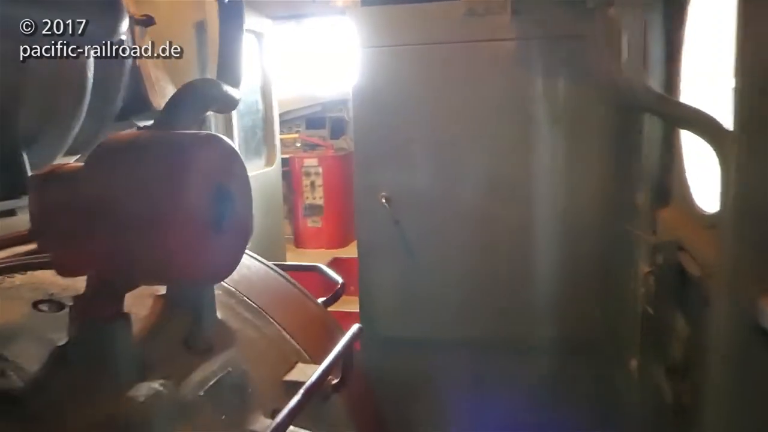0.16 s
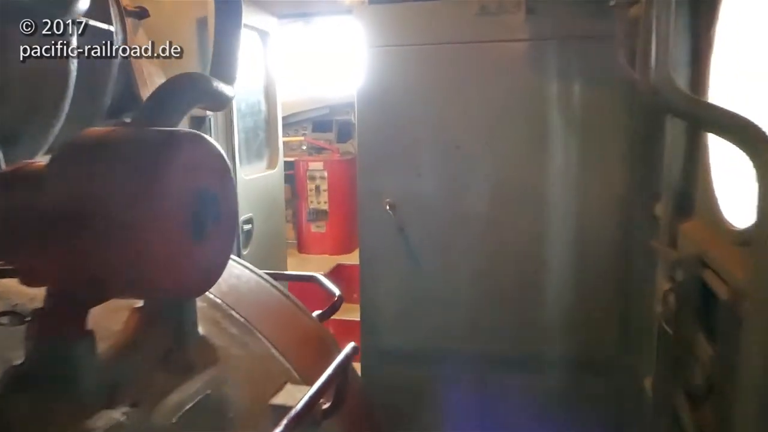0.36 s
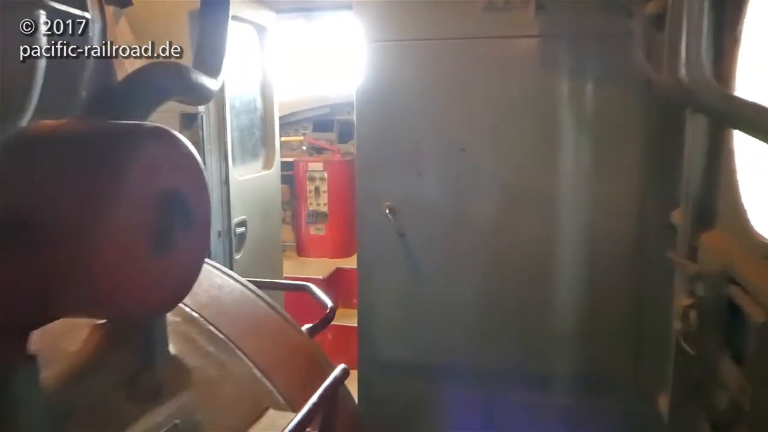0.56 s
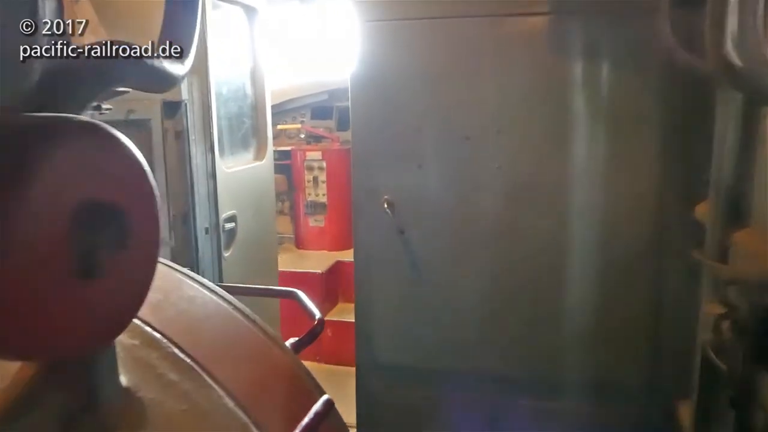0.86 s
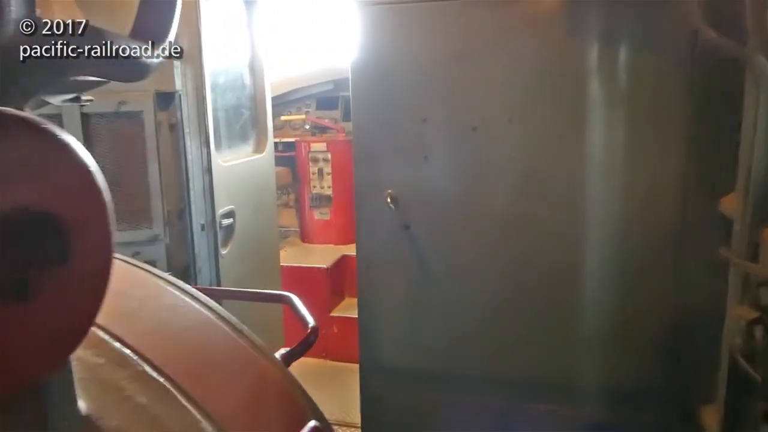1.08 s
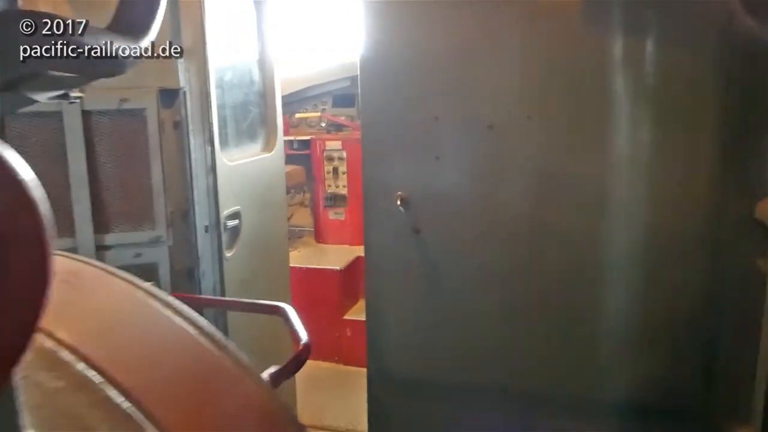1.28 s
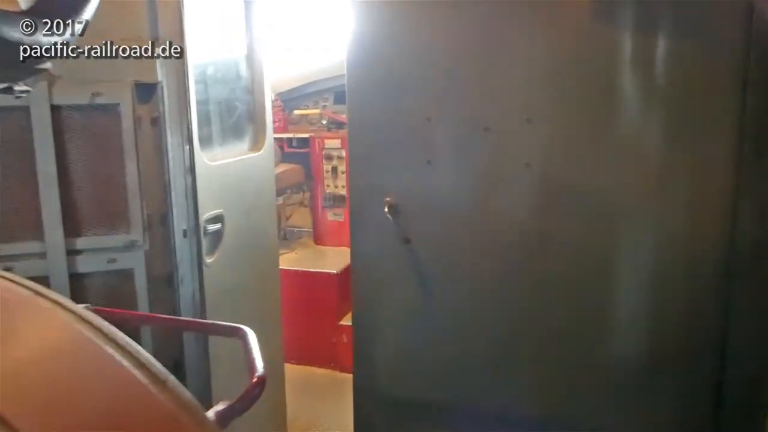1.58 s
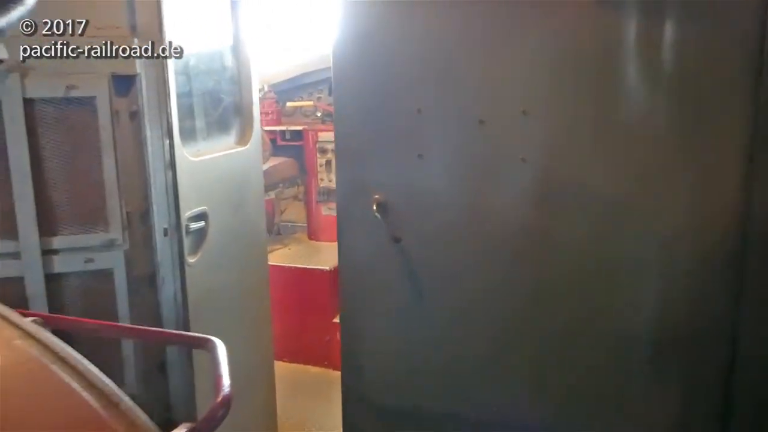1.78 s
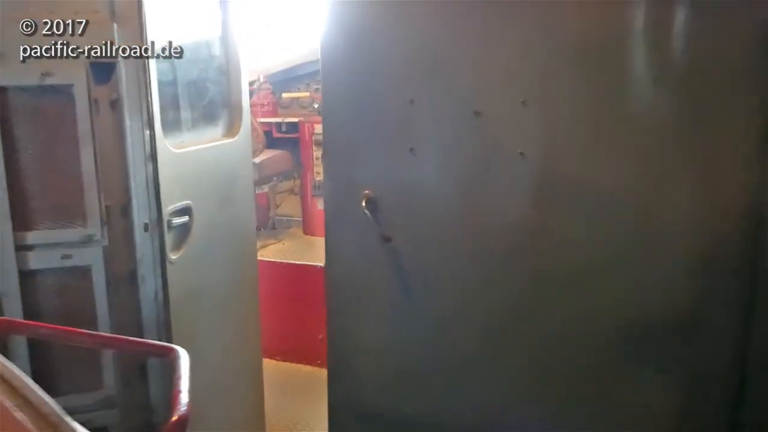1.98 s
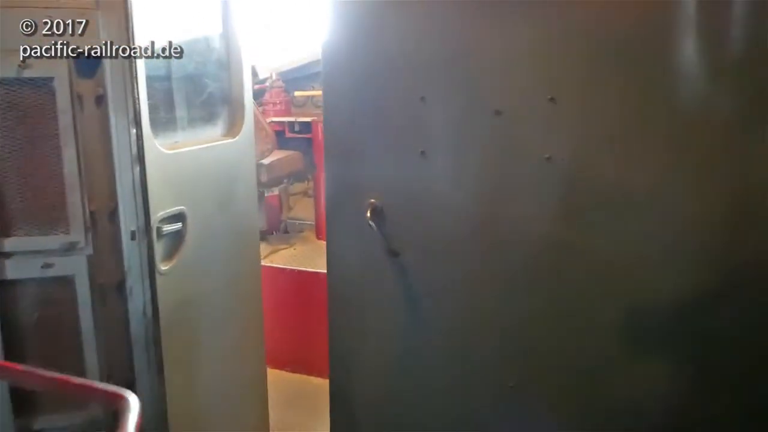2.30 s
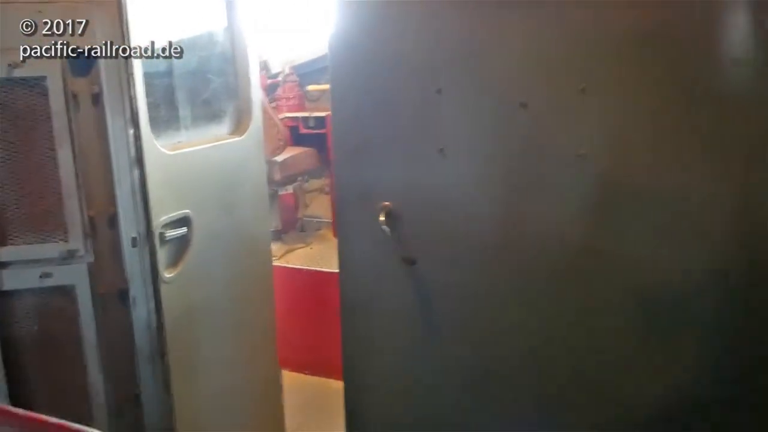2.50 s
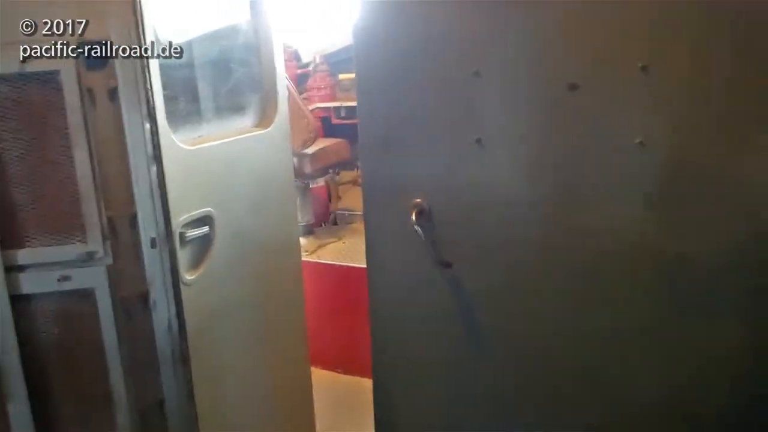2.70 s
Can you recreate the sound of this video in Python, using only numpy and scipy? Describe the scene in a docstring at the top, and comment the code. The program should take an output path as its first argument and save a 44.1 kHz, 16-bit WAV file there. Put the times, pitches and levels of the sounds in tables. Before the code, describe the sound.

A large diesel engine idles continuously in a cramped steel engine room, its low drone swelling and fading as a handheld microphone moves; dense mechanical clatter, deep rumble and faint airy hiss surround it.

```python
"""A big diesel idles near 800 rpm, slowing slightly, in the steel engine room of a locomotive.
Multiples of the crank rate are summed as sines; they swell and fade as the microphone is carried
through the room's standing waves. Shaped stereo noise makes a low rumble, two soft deep thuds
(perhaps footsteps of whoever carries the microphone), a dense clatter throbbing faintly with the
crank, a humming steel panel, and an airy hiss with three high resonances."""
import sys
import numpy as np
from scipy import signal
from scipy.fft import rfft, irfft, next_fast_len
from scipy.io import wavfile

SR = 44100
rng = np.random.default_rng(int(sys.argv[2]) if len(sys.argv) > 2 else 0)


def master_out(mix):
    """Clip the mix to full scale and print it as 16-bit PCM to the path in sys.argv[1]."""
    frames = np.transpose(np.atleast_2d(mix))
    ceiling = np.clip(frames, -1, 1)
    pcm = np.round(ceiling * 32767).astype(np.int16)
    wavfile.write(sys.argv[1], SR, pcm)


N = 125685


def from_db(db):
    """Decibels to amplitude gain."""
    return 10 ** (np.asarray(db) / 20)


def rms_one(x):
    """Scale to unit rms."""
    return x / np.sqrt(np.mean(x ** 2) + 1e-20)


def in_time(rows):
    """Interpolate each column of a table, after its seconds, at every sample."""
    seconds, *columns = np.transpose(rows)
    t = np.arange(N) / SR
    return [np.interp(t, seconds, column) for column in columns]


def at_hz(points, hz):
    """Interpolate a table on a log-frequency axis."""
    point_hz, values = np.transpose(points)
    return np.interp(np.log(hz + 1e-6), np.log(point_hz), values)


def pan(db):
    """Left and right gains, db apart (positive: left louder), with mean 1."""
    gains = from_db(np.array([[db], [-db]]) / 2)
    return gains / gains.mean()


def drift(rate_hz):
    """Smooth random motion of rms 1: white noise through two equal low-pass poles at rate_hz."""
    step = 40  # samples per slow sample
    settle = 2000  # slow samples
    pole = np.exp(-2 * np.pi * rate_hz * step / SR)
    white = rng.standard_normal(N // step + 2 + settle)
    slow = signal.lfilter([1], [1, -2 * pole, pole * pole], white)[settle:]
    return np.interp(np.arange(N) / step, np.arange(len(slow)), rms_one(slow))


def unsteady(depth, rate_hz):
    """Complex gain around 1 that drifts in level and phase."""
    return 1 + depth * (drift(rate_hz) + 1j * drift(rate_hz))


# Left-right correlation of the room noise. Each row: frequency in Hz, correlation (no unit).
ALIKE_BY_HZ = [(30, 0.36), (100, 1), (250, 0.66), (600, .6), (1200, 0.7), (2500, .57), (5500, .46),
               (9000, 0.31), (14000, .1)]


def room_noise(gain_at):
    """Diffuse stereo noise: mid and side weighted by left-right correlation; mid has rms 1."""
    size = next_fast_len(N)
    hz = np.arange(size // 2 + 1) * SR / size
    alike = np.clip(at_hz(ALIKE_BY_HZ, hz), -.99, .99)
    white = rfft(rng.standard_normal((2, size)))
    spectra = white * gain_at(hz) * np.sqrt([1 + alike, 1 - alike])
    mid, side = irfft(spectra, size)[:, :N]
    return np.array([mid + side, mid - side]) / mid.std()


def broad_noise(colour):
    """Room noise of a tabled spectrum that falls 12 dB per octave beyond the table's end values."""
    low_hz, high_hz = colour[0][0], colour[-1][0]

    def gain_at(hz):
        below = np.minimum(hz / low_hz, 1) ** 2
        above = (high_hz / np.maximum(hz, high_hz)) ** 2
        return from_db(at_hz(colour, hz)) * below * above

    return room_noise(gain_at)


def resonant_noise(centre_hz, half_width_hz):
    """Room noise in one resonance, 6 dB down at half_width_hz either side of its centre."""
    return room_noise(lambda hz: 1 / (1 + ((hz - centre_hz) / half_width_hz) ** 2))


# Hiss spectrum. Each row: frequency in Hz, relative level in dB.
HISS_COLOUR = [(1800, -4), (3100, -1.5), (4400, -.5), (5900, 1), (7000, -4.5), (7900, -7), (9300, -6.5),
               (10300, -10.5), (12400, -12), (13700, -19), (15700, -20)]
# High resonances. Each row: centre in Hz, half-width in Hz, level before swell in dB,
# share of the swell (no unit).
WHISTLES = [(8780, 320, -69, 0.36), (11540, 200, -75, 1.0), (14800, 450, -80, .5)]
# Common swell of the whistles. Each row: time in seconds, level change in dB.
WHISTLE_SWELL = [(0, 0), (.36, -12), (.56, 1), (1.2, -2), (1.58, -5), (1.92, 3.5), (2.17, 0), (2.45, 4),
                 (2.85, 0)]
HISS_DB, HISS_PAN_DB = -57, 1.1
HISS_FLUTTER_DB, HISS_FLUTTER_HZ = 0.33, 5


def hiss(path_db):
    """Rushing air: broad noise plus three narrow noise bands that swell together."""
    level_db = HISS_DB + path_db + HISS_FLUTTER_DB * drift(HISS_FLUTTER_HZ)
    out = from_db(level_db) * broad_noise(HISS_COLOUR)
    swell_db, = in_time(WHISTLE_SWELL)
    for centre_hz, half_width_hz, whistle_db, share in WHISTLES:
        gain = from_db(whistle_db + share * swell_db)
        out = out + gain * resonant_noise(centre_hz, half_width_hz)
    return out * pan(HISS_PAN_DB)


# Panel hum. Each row: time in seconds, level in dB.
PANEL_LEVEL = [(0, -77), (1.1, -58.5), (1.5, -51.5), (1.85, -59.5), (2.17, -54), (2.4, -60.5), (2.85, -67)]
PANEL_HZ, PANEL_HALF_WIDTH_HZ, PANEL_PAN_DB = 591, 31, 1.0


def panel():
    """Sheet steel shaken by the engine: noise in one narrow resonance."""
    level_db, = in_time(PANEL_LEVEL)
    ring = resonant_noise(PANEL_HZ, PANEL_HALF_WIDTH_HZ)
    return from_db(level_db) * ring * pan(PANEL_PAN_DB)


# Rumble spectrum. Each row: frequency in Hz, relative level in dB.
RUMBLE_COLOUR = [(70, -11.5), (88, 1), (112, -7.5), (135, -2.5), (200, -7.5), (260, -12.5), (400, -26.5)]
# Deep noise spectrum. Each row: frequency in Hz, relative level in dB.
DEEP_COLOUR = [(14, 0), (25, 7), (42, 2), (62, -1), (95, -25)]
# Deep noise level with its two thuds. Each row: time in seconds, level change in dB.
DEEP_LEVEL = [(0, -4), (.15, 1), (.26, 13), (.38, 0), (.6, 5), (1.25, 0), (1.53, -12), (1.9, 0), (2.15, -7),
              (2.33, 11), (2.5, -7), (2.85, -1)]
RUMBLE_DB, RUMBLE_PAN_DB = -38.5, 5.5
DEEP_DB, DEEP_PAN_DB = -47, 4.5


def rumble(path_db):
    """Low engine rumble, over deep noise with two soft thuds, perhaps the carrier's footsteps."""
    change_db, = in_time(DEEP_LEVEL)
    deep = from_db(DEEP_DB + change_db) * broad_noise(DEEP_COLOUR) * pan(DEEP_PAN_DB)
    low = from_db(RUMBLE_DB + path_db) * broad_noise(RUMBLE_COLOUR) * pan(RUMBLE_PAN_DB)
    return deep + low


# Clatter spectrum. Each row: frequency in Hz, relative level in dB.
CLATTER_COLOUR = [(180, -16), (335, -0.4), (430, -1), (520, -5.5), (700, -7.5), (950, -7.5), (1300, -11.5),
                  (1650, -15), (2080, -14.5), (2650, -23), (4000, -35)]
# Throb of the clatter. Each row: multiple of the crank rate, modulation depth (both no unit).
THROB = [(2, .035), (2.5, .03), (3, .03), (4, .04), (4.5, .035), (6, .03), (11, .03)]
CLATTER_DB, CLATTER_PAN_DB = -45, 1.0
CLATTER_FLUTTER_DB, CLATTER_FLUTTER_HZ = 0.4, 5


def clatter(angle_rad, path_db):
    """Combustion and valve gear, smeared by steel walls into noise modulated at crank multiples."""
    throb = 0
    for order, depth in THROB:
        throb = throb + depth * np.cos(order * angle_rad + 2 * np.pi * rng.random())
    level_db = CLATTER_DB + path_db + CLATTER_FLUTTER_DB * drift(CLATTER_FLUTTER_HZ)
    return from_db(level_db) * (1 + throb) * broad_noise(CLATTER_COLOUR) * pan(CLATTER_PAN_DB)


SMEAR_RAD = .56  # room's phase lag, per order squared


def smeared_phase(order, angle_rad):
    """Phase of a crank multiple; lag growing with order squared spreads each turn in time."""
    return order * angle_rad - SMEAR_RAD * order ** 2


# Weaker partials. Each row: multiple of the crank rate (no unit), level before trim in dB.
WEAK_ORDERS = [(3, -50), (4, -45.5), (5, -46.5), (6, -48.5), (6.5, -62), (7, -48.5), (9, -51.5), (15, -48),
               (18, -54), (19, -53.5), (25, -59), (26, -58), (27, -57), (29, -59.5), (30, -64.5),
               (32, -62.5), (33, -60.5), (37, -58), (45, -63.5)]
WEAK_TRIM_DB, WEAK_PAN_DB = -1.25, 4.2
WEAK_WANDER, WEAK_WANDER_HZ = .35, 0.57


def overtones(angle_rad):
    """Weaker multiples and half multiples, wandering slowly in level and phase."""
    out = 0
    for order, level_db in WEAK_ORDERS:
        wander = unsteady(WEAK_WANDER, WEAK_WANDER_HZ)
        tone = np.real(wander * np.exp(1j * smeared_phase(order, angle_rad)))
        out = out + from_db(level_db + WEAK_TRIM_DB) * rms_one(tone)
    return out * pan(WEAK_PAN_DB)


# Strong partials. Each entry: multiple of the crank rate (no unit).
DRONE_ORDERS = (8, 11, 12, 13, 14, 21)
# Their levels along the microphone's path. Each row: time in seconds, then six levels
# before trim in dB, in the order of DRONE_ORDERS.
DRONE_LEVELS = [(0, -33.5, -49, -55, -36.5, -51, -45), (0.1, -40.2, -35.5, -60, -40, -40, -44),
                (0.22, -34.5, -30.4, -61, -38, -43.3, -44), (0.38, -33, -26, -53, -34.5, -57, -55),
                (0.52, -32.5, -31.5, -60, -34.5, -53, -54.9), (0.65, -43, -29, -55, -39, -45, -48.5),
                (0.8, -33.5, -31.5, -60, -35.5, -39, -44), (1.0, -55, -31, -53, -35, -54, -53),
                (1.15, -43, -39.3, -72, -39, -45.5, -51), (1.3, -30, -40, -35.5, -49, -39, -49.2),
                (1.45, -29, -44, -35, -51, -36.5, -46.5), (1.6, -33.5, -37.5, -46, -34.5, -41, -44.5),
                (1.8, -32.4, -40, -48, -37.5, -50, -60), (2.0, -29, -32.5, -36.5, -44.5, -41.5, -52.5),
                (2.25, -32, -39.5, -38.5, -51, -37, -52), (2.5, -36.5, -32, -55, -64, -51, -58.0),
                (2.65, -34, -33, -47, -60, -71, -64), (2.85, -32, -47, -49, -36.5, -51, -51)]
DRONE_TRIM_DB, DRONE_PAN_DB = -0.55, 5.5
DRONE_ROUGH, DRONE_ROUGH_HZ = 0.054, 10.7
DRONE_WANDER_RAD, DRONE_WANDER_HZ = 0.48, .4


def drone(angle_rad):
    """Strong crank multiples in standing waves: slow phase wander, slight fast unevenness."""
    out = 0
    for order, level_db in zip(DRONE_ORDERS, in_time(DRONE_LEVELS)):
        uneven = unsteady(DRONE_ROUGH, DRONE_ROUGH_HZ)
        phase = smeared_phase(order, angle_rad) + DRONE_WANDER_RAD * drift(DRONE_WANDER_HZ)
        out = out + from_db(level_db + DRONE_TRIM_DB) * np.real(uneven * np.exp(1j * phase))
    return np.sqrt(2) * out * pan(DRONE_PAN_DB)  # sqrt(2): peak to rms levels


# Crank speed. Each row: time in seconds, speed in turns per second.
CRANK_SPEED = [(0, 13.39), (.7, 13.37), (1.2, 13.29), (2.0, 13.28), (2.5, 13.17), (2.85, 13.2)]
# Level change along the microphone's path. Each row: time in seconds, rumble in dB,
# clatter in dB, hiss in dB.
PATH_LEVELS = [(0, 4, 0, 0.3), (.45, 3.5, 2, -0.3), (.8, .3, -0.1, 0.5), (1.4, 0, .5, 0.2),
               (2.0, -2, -0.6, 0.2), (2.55, -5.5, -0.7, 0.6), (2.85, 2.5, -2, 0.3)]


def scene():
    """Crank angle drives drone, overtones and clatter; hiss, panel and rumble fill the room."""
    turns_per_s, = in_time(CRANK_SPEED)
    angle_rad = 2 * np.pi * np.cumsum(turns_per_s) / SR
    rumble_db, clatter_db, hiss_db = in_time(PATH_LEVELS)
    room = hiss(hiss_db) + panel() + rumble(rumble_db)
    return room + clatter(angle_rad, clatter_db) + overtones(angle_rad) + drone(angle_rad)


CUTOFF_HZ, RIPPLE_DB, STOP_DB = 15700, .1, 80


def record(dry):
    """Steep elliptic low-pass."""
    sos = signal.ellip(12, RIPPLE_DB, STOP_DB, CUTOFF_HZ, fs=SR, output="sos")
    return signal.sosfilt(sos, dry)


dry = scene()
out = record(dry)
master_out(out)
```